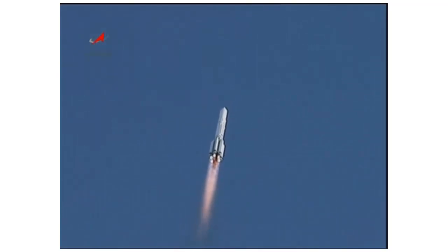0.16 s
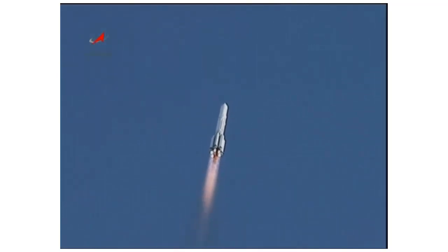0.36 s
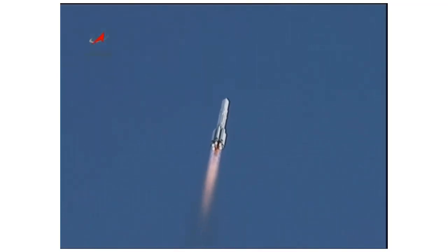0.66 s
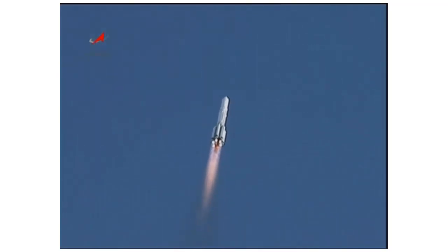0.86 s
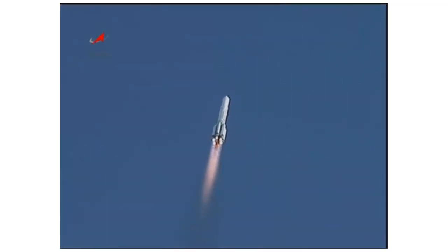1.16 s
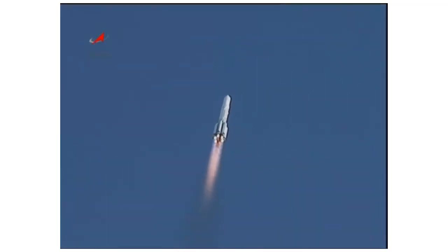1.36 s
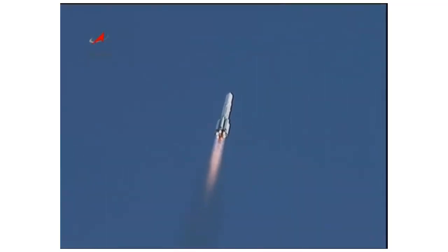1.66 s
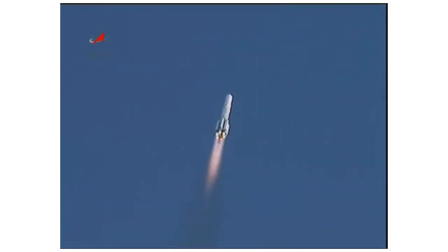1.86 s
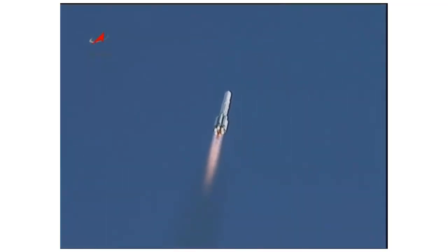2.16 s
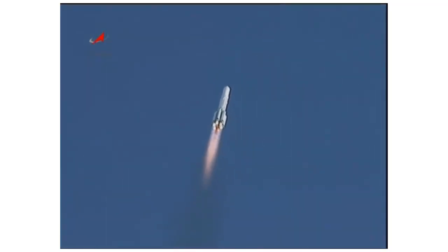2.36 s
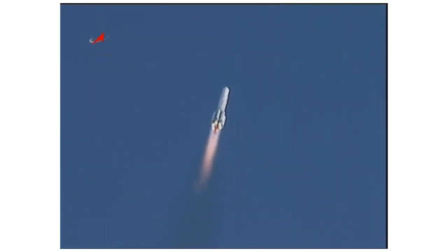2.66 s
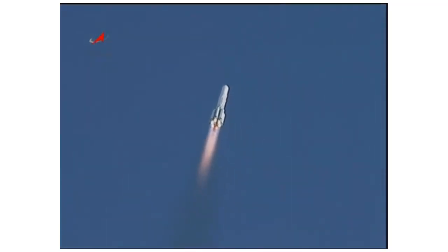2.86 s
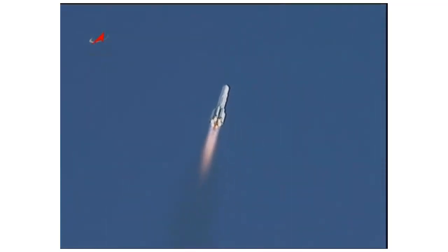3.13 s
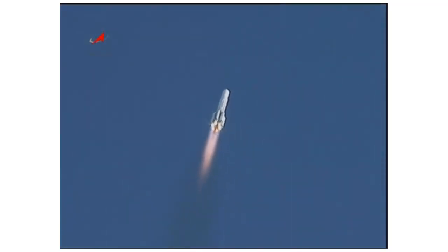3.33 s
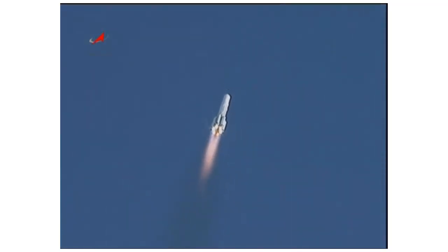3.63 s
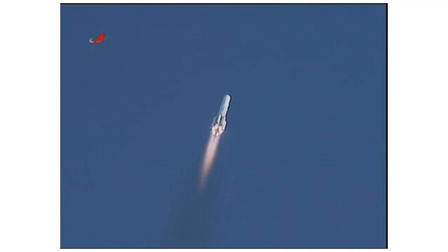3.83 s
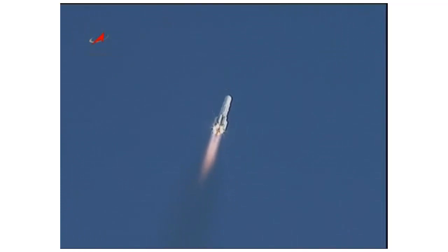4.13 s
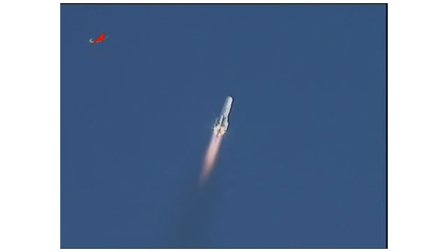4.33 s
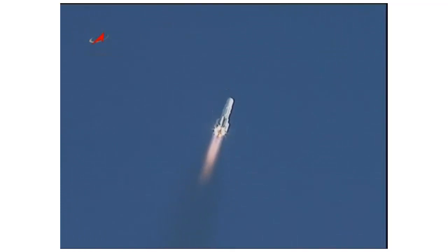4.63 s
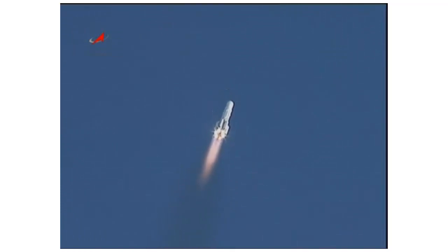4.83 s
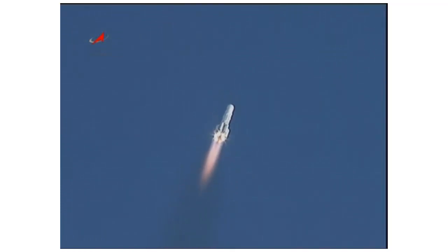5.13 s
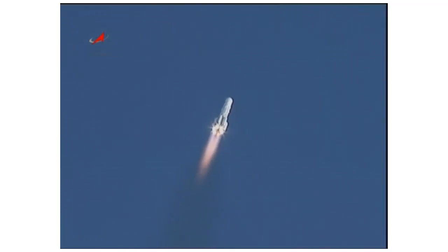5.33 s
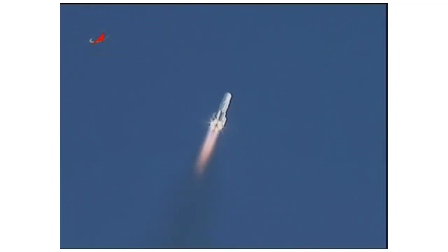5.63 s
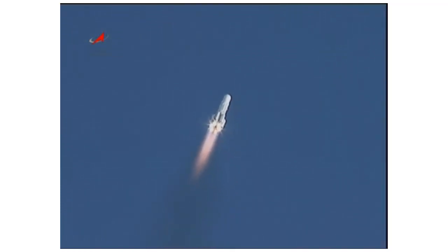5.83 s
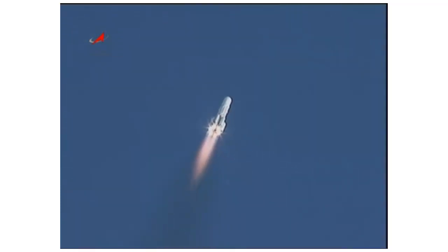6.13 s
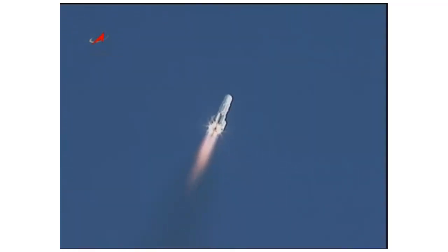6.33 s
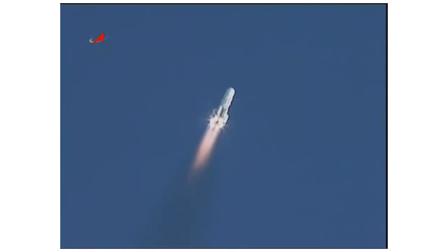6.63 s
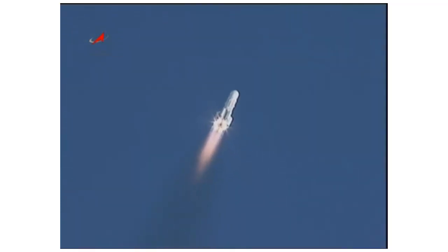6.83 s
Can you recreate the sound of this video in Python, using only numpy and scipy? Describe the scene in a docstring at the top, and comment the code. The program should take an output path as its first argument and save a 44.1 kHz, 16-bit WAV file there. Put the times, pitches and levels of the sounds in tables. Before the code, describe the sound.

A large rocket climbs away with a heavy, distorted roar and dense tearing crackle, slowly growing duller and fainter, with one tiny dropout near the end.

```python
"""Rocket climbing away, overloaded microphone

Open ground: a large rocket gives a turbulent roar, slow surges and a train of steep shock fronts.
Roar is gusting filtered noise, shocks are tanh jumps, cracks are short steep pulses; the ground doubles them.
Soft saturation and a bass cut square the waves into a tearing crackle trailed by fizz.
The sound dulls and fades with distance; once it cuts out briefly, with a click at each end."""
import sys
import numpy as np
from scipy import signal
from scipy.fft import rfft, irfft, next_fast_len
from scipy.io import wavfile
from scipy.ndimage import uniform_filter1d

SR = 44100
rng = np.random.default_rng(int(sys.argv[2]) if len(sys.argv) > 2 else 0)


def dump_mix(stems):
    """Bounce the given channels to the path in sys.argv[1] as a 16-bit WAV at rate SR."""
    frames = np.atleast_2d(stems).T  # one column per channel
    limited = np.clip(frames, -1, 1)  # hard clip at full scale
    pcm = np.round(limited * 32767).astype(np.int16)
    wavfile.write(sys.argv[1], SR, pcm)


N = 308258

# Turbulent roar spectrum, of which only the shape counts. Each row: frequency in Hz, density in dB per Hz.
ROAR_SPECTRUM = [(12, 1.5), (35, -16.5), (80, 8), (150, -2), (260, -8.5), (450, -15), (900, -19.5),
                 (2000, -27.5), (10000, -58)]
# Sharpness of the wave fronts, used relative to its mean. Each row: time in seconds, treble level in dB.
PLUME_SHARPNESS = [(0.0, -58.5), (0.33, -48), (0.99, -52.5), (1.261, -50.5), (1.54, -55), (2.61, -53.5),
                   (2.7, -54.5), (5.59, -58.5), (5.649, -64.5), (6.29, -55.5), (6.6, -62), (6.99, -60)]
# Lag of the ground reflection, growing as the rocket rises. Each row: time in seconds, lag in seconds.
GROUND_LAG = [(0, 0.0056), (3.5, .0058), (7, 0.00608)]
# Largest surges, which hush the crackle. Each row: middle in seconds, length in seconds.
LARGE_SURGES = [(0.2528, 0.018), (0.292, 0.0099), (0.388, 0.0069), (0.488, 0.0087), (0.855, 0.01),
                (0.915, 0.0082), (0.983, 0.0059), (1.009, 0.0078), (1.096, 0.011), (1.166, 0.0082),
                (1.304, .006), (1.329, 0.0067), (1.59, 0.0098), (1.896, 0.0087), (1.967, 0.0065),
                (2.136, 0.0082), (2.306, 0.01), (2.553, 0.015), (2.697, 0.0078), (2.808, 0.011),
                (2.896, 0.0096), (3.038, .006), (3.061, 0.007), (3.169, 0.0069), (3.280, 0.0077),
                (3.359, 0.0092), (3.46, 0.0084), (3.625, .011), (4.129, 0.0084), (4.278, 0.00876),
                (4.424, 0.008), (4.497, 0.0073), (4.541, 0.0093), (4.585, 0.0058), (4.763, 0.0063),
                (5.339, 0.0086), (5.554, 0.0093), (5.583, 0.013), (5.733, 0.0088), (6.035, 0.006),
                (6.249, .008), (6.275, 0.0087), (6.781, 0.0098)]
# Loudest cracks; snap and echo levels set edge steepness, relative to the mean snap. Each row: time in
# seconds, snap level in dB, ground echo snap level in dB, rasp of the volley around it in dB.
LOUD_CRACKS = [(0.0146, -49, -51, 9), (0.049, -46.0, -49.0, 3.0), (0.0716, -52.5, -60, 14),
               (0.1034, -53, -60, -2), (0.1426, -51.5, -43, 2), (0.1756, -39.5, -46, 10),
               (0.2351, -52.5, -65, -10), (0.272, -37, -38, 9), (0.3554, -37, -41, 8),
               (0.3946, -43.5, -48.0, 10), (0.4242, -51, -71, 0.5), (0.4777, -32, -46, 2.0),
               (0.5001, -44.5, -56.0, 8.5), (0.5259, -57, -49, 8), (0.5621, -51, -56.0, 2),
               (0.5887, -49, -63, -4), (0.6659, -45, -54, 2.0), (0.7156, -51, -39, -17),
               (0.7532, -49, -60, -3), (0.8124, -51, -54, 13), (0.83, -49.5, -54.0, 8),
               (0.85, -53, -67, -18), (0.8855, -54, -46, 6), (0.9331, -43.5, -40, 9),
               (1.0637, -53, -56, -4), (1.0852, -40, -37, 10), (1.1059, -53, -46.0, 2),
               (1.1801, -50, -51.0, -2), (1.199, -56, -64, 0), (1.234, -53.5, -51, 5),
               (1.266, -59, -54.0, -4), (1.3142, -55.5, -76, 17), (1.338, -46, -51, 1),
               (1.3653, -46.5, -48, -13), (1.375, -50, -55, -7), (1.3947, -42, -50, -6),
               (1.4831, -54, -54, 6), (1.5136, -45.5, -53, -5), (1.532, -51, -71, -2),
               (1.5795, -51.0, -62, 5), (1.6235, -49, -67, -2), (1.6925, -51.5, -65, -17),
               (1.7542, -39.5, -41, 7), (1.7736, -56, -57, -1.0), (1.7972, -58, -52.0, 11),
               (1.815, -54, -59, 1), (1.8361, -40, -44, -4), (1.8853, -51.5, -60, 2.0),
               (1.9294, -57, -63, 5), (1.9474, -53.5, -57, 1), (1.9941, -37.5, -48, 0),
               (2.1495, -44, -54, 6), (2.228, -54, -55, 7), (2.282, -48.5, -54, 13),
               (2.3162, -51, -44, 2.0), (2.3501, -51.5, -73, -1), (2.4067, -49.5, -58, -4),
               (2.4257, -51, -59.0, 10), (2.4477, -52.5, -58, 4), (2.4693, -50, -48, -3),
               (2.5031, -37.5, -52, 3), (2.5314, -43.5, -35, 17), (2.5968, -47, -51, 3),
               (2.6782, -33, -51, 25), (2.708, -52, -52.0, 3), (2.7337, -44.5, -47, 3),
               (2.7707, -48, -47, 1.0), (2.796, -51, -57.0, 3), (2.8421, -54.5, -47, -8),
               (2.9267, -55.5, -53, 0), (2.9575, -47, -54, -2), (2.9845, -51.5, -62, 11),
               (3.0532, -51, -63, -5), (3.0767, -63.5, -57, -4), (3.1559, -51.5, -56, 8),
               (3.1875, -52.0, -64, 7), (3.2273, -56, -53, 2.0), (3.2597, -52, -59.0, 3.0),
               (3.2892, -49, -57, 13), (3.3389, -53.5, -62, 5), (3.3682, -55, -60, -1),
               (3.4391, -56, -44, 12), (3.4639, -44, -41, 7), (3.4767, -60.5, -50, 7),
               (3.4866, -52, -58, 0), (3.4993, -52, -65, 12), (3.5108, -53.5, -64, -10),
               (3.5554, -50, -51, 13), (3.6037, -45.5, -50, 1), (3.7083, -47.5, -60, 4),
               (3.7367, -51, -49, 4), (3.8227, -50, -46, 14.5), (3.9449, -58.5, -56, -7),
               (4.0166, -60, -56, 6), (4.054, -50, -61.0, 10), (4.1396, -49.5, -71, 3),
               (4.2027, -52.5, -55, -2), (4.2318, -56.5, -62, 4.0), (4.3314, -56.5, -58, -14),
               (4.3673, -50.5, -55, -2), (4.4784, -56.5, -69, 5), (4.5067, -51.5, -57, 5),
               (4.5262, -56.5, -69, 12), (4.5499, -51.5, -48, -3), (4.6181, -58, -61, 0),
               (4.6698, -64, -62, 9), (4.7014, -55.5, -60, 8), (4.7772, -34.5, -53.5, 9.0),
               (4.8159, -53, -63.0, 1), (4.9219, -61, -73, -1), (4.9737, -60.5, -68, -8),
               (5.0387, -54.5, -62, 6), (5.085, -42, -49.0, 10), (5.135, -58.5, -70, 5),
               (5.1661, -62, -77, 11), (5.178, -66, -68, 3), (5.2124, -50.5, -53, 0),
               (5.2427, -56.5, -67, 2), (5.2605, -57.0, -68, 1.0), (5.3492, -60, -70, -6),
               (5.3678, -54.5, -36, 13), (5.4211, -53, -56, 4), (5.5008, -56, -66, 6),
               (5.5401, -54.5, -72, -2), (5.5722, -57, -63, 4), (5.593, -50, -50.5, 2.0),
               (5.669, -53.5, -57, 8), (5.7034, -53, -49, 1), (5.7197, -46.5, -55, 6.0),
               (5.7653, -53, -50, 6), (5.8039, -48, -50, -6), (5.8494, -53.5, -60, 7),
               (5.9027, -59.5, -59, 1), (5.9131, -47.5, -63, -3), (6.0477, -55, -57, 12),
               (6.0849, -52, -70, -5), (6.112, -56, -55, 5), (6.2056, -54, -60.0, -1),
               (6.228, -47, -46.5, -5), (6.2881, -47, -42.5, -2), (6.3561, -56.5, -56.0, 5.0),
               (6.3763, -54.5, -70.0, -7), (6.4078, -60, -60, 1), (6.4272, -56.5, -61, 8),
               (6.4403, -58.5, -69, -4), (6.5272, -65.5, -62, 7), (6.5945, -63.5, -68, 5),
               (6.6667, -60, -64, -9), (6.7451, -54.5, -64, 2.0), (6.7916, -58.5, -69, -5),
               (6.8964, -60.0, -69, 12)]
# Microphone response. Each row: frequency in Hz, gain in dB.
MICROPHONE_RESPONSE = [(30, 1), (60, 3.5), (90, -0.5), (125, 3), (175, 0.5), (250, 0.5), (320, -2),
                       (410, 0.5), (560, -0.5), (900, -0.5), (1500, -2), (11000, -5.5)]
# Spectrum shape of the fizz on the crackle. Each row: frequency in Hz, density in dB per Hz.
FIZZ_SPECTRUM = [(500, -58.5), (1500, 8), (3000, 5.5), (4500, 0), (6000, -3.5), (10000, -11.5),
                 (13000, -26)]
# The one dropout: start in seconds, end in seconds.
DROPOUT = (5.3725, 5.4205)

BAND_LIMIT_HZ = 12000
TIME_S = np.arange(N) / SR
VOLLEY_LAG_S, VOLLEY_S = 0.00068, 0.0085
LULL_DB, REBOUND_DB, REBOUND_LAG_S, REBOUND_S = -3, 2.5, 0.0055, 0.0033


def amp(db):
    """Decibels to gain."""
    return 10 ** (np.asarray(db) / 20)


def evened(x):
    """Scales to rms 1, over all channels together."""
    return x / np.sqrt(np.mean(x ** 2) + 1e-20)


def coloured(x, points):
    """Filters by a spectrum of (Hz, dB) points, interpolated over log frequency."""
    points_hz, points_db = np.transpose(points)
    size = next_fast_len(N + 8192)  # padding against wrap-around
    bins_hz = np.fft.rfftfreq(size, 1 / SR)
    gain = amp(np.interp(np.log(bins_hz + 1), np.log(points_hz), points_db))
    return irfft(rfft(x, size) * gain, size)[..., :N]


def band(x, hz, kind, order=1):
    """Causal Butterworth low-pass or high-pass."""
    sos = signal.butter(order, min(hz, SR / 2 - 1), kind, fs=SR, output="sos")
    return signal.sosfilt(sos, x)


def around(at_s, reach_s):
    """Slice of samples within reach of a moment, and their times counted from it."""
    first = max(int((at_s - reach_s) * SR), 0)
    last = max(int((at_s + reach_s) * SR), 0)
    part = slice(first, last)
    return part, TIME_S[part] - at_s


def normal_within(count, low, high):
    """Normal draws, clipped."""
    return np.clip(rng.standard_normal(count), low, high)


def wander(per_s):
    """Random curve: straight lines between normal draws, per_s draws a second."""
    return np.interp(TIME_S * per_s, np.arange(1000), rng.standard_normal(1000))


def moments(per_s, scatter):
    """Irregular times: an even pace, each early or late by a random share of the gap."""
    chance = rng.standard_normal(3000)
    return (np.arange(len(chance)) + scatter * chance) / per_s


def between_cracks(times_s, values, clear_s):
    """Rows (s, value) for those times that keep clear of the loud cracks."""
    loud_s = np.transpose(LOUD_CRACKS)[0]
    return [(s, value) for s, value in zip(times_s, values)
            if s < TIME_S[-1] and abs(loud_s - s).min() > clear_s]


def ground_lag(at_s):
    """Lag in seconds of the ground reflection."""
    return np.interp(at_s, *np.transpose(GROUND_LAG))


def ground(x, echo_db=-3, dull_hz=7000, wander_s=0.0005, wander_per_s=22):
    """Ground returns each wave duller and later; the lag wanders as the source moves along the plume."""
    lag_s = ground_lag(TIME_S) + wander_s * wander(wander_per_s)
    echo = np.interp(TIME_S - lag_s, TIME_S, band(x, dull_hz, "low"))
    return x + amp(echo_db) * echo


def stereo_noise(level_db=-31):
    """Faint noise, independent left and right, coloured like the roar."""
    return amp(level_db) * evened(coloured(rng.standard_normal((2, N)), ROAR_SPECTRUM))


def plume(flicker_db=2.1, flickers_per_s=30):
    """Sharpness of the fronts in dB about its mean: it flickers and falls with distance."""
    times_s, db = np.transpose(PLUME_SHARPNESS)
    return np.interp(TIME_S, times_s, db - db.mean()) + flicker_db * wander(flickers_per_s)


def volleys():
    """Rasp in dB: set around each loud crack, sinking in each large surge, rebounding just after it."""
    rasp_db = np.zeros(N)
    for s, _, _, volley_db in LOUD_CRACKS:
        part, t = around(s + VOLLEY_LAG_S, 10 * VOLLEY_S)
        rasp_db[part] += volley_db * np.exp(-(t / VOLLEY_S) ** 2)
    for s, length_s in LARGE_SURGES:
        part, t = around(s + length_s / 2 + REBOUND_LAG_S, 10 * length_s)
        lull = (t < 0) & (t > -length_s - REBOUND_LAG_S)
        rebound_db = (t >= 0) * REBOUND_DB * np.exp(-abs(t) / REBOUND_S)
        rasp_db[part] = np.where(lull, LULL_DB, rasp_db[part] + rebound_db)
    return uniform_filter1d(rasp_db, size=45)  # 1 ms


def roar(sharp_db, rasp_db, level_db=-6, split_hz=500, brighten=0.69, gust_db=2.5, gusts_per_s=40):
    """Turbulent mixing noise; its upper part gusts and follows the volleys and the plume's sharpness."""
    noise = evened(coloured(rng.standard_normal(N), ROAR_SPECTRUM))
    low = band(noise, split_hz, "low")
    upper_db = brighten * sharp_db + rasp_db + gust_db * wander(gusts_per_s)
    return amp(level_db) * (low + (noise - low) * amp(upper_db))


def lesser_surges(per_s=8, scatter=0.4, length_s=0.0055, spread_db=1.5, clear_s=0.014):
    """Rows (middle s, length s) of the extra surges, at random between the loud cracks."""
    times_s = moments(per_s, scatter)
    lengths_s = length_s * amp(spread_db * normal_within(len(times_s), -2, 1))
    return between_cracks(times_s, lengths_s, clear_s)


def surges(size_db=12, trough=0.69, trough_s=0.00077):
    """Large eddies: a long flat push, then a short trough."""
    out = np.zeros(N)
    for s, length_s in list(LARGE_SURGES) + lesser_surges():
        part, t = around(s, 2 * length_s + 10 * trough_s)
        push = np.exp(-(2 * t / length_s) ** 6)  # flat top
        suction = np.exp(-((t - length_s / 2 - trough_s) / trough_s) ** 2)
        out[part] += push - trough * suction
    return amp(size_db) * out


def front(t, rise_s, relax_s):
    """Shock: pressure sags, jumps up within the rise time, and relaxes."""
    return np.tanh(t / rise_s) * np.exp(-abs(t) / relax_s)


def shocks(sharp_db, rasp_db, per_s=150, level_db=1, spread_db=4, rise_s=0.0004, relax_s=0.0039,
           relax_spread_db=3.5, steepen=0.78, volley_steepen=1.6, scatter=0.495):
    """Irregular fronts; stronger ones are steeper, and the air rounds them as the rocket recedes."""
    times_s = moments(per_s, scatter)
    sizes = amp(spread_db * normal_within(len(times_s), -2, 1))
    steep_db = np.interp(times_s, TIME_S, steepen * sharp_db + volley_steepen * rasp_db)
    rises_s = rise_s / sizes / amp(steep_db)
    relaxes_s = relax_s * amp(relax_spread_db * normal_within(len(times_s), -2, 2))
    out = np.zeros(N)
    for s, size, rise, relax in zip(times_s, sizes, rises_s, relaxes_s):
        part, t = around(s, 10 * relax)
        out[part] += size * front(t, rise, relax)
    return amp(level_db) * out


def swallowed(hard_fronts, middle_s=0.0011, reach_s=0.00069, depth=1.0, echo_depth=0.72):
    """Gain of the small waves: each crack and its ground echo overtake and swallow their neighbours."""
    gain = np.ones(N)
    for s, _ in hard_fronts:
        for at_s, share in (s, depth), (s + ground_lag(s), echo_depth):
            part, t = around(at_s + middle_s, 10 * reach_s)
            gain[part] *= 1 - share * np.exp(-(t / reach_s) ** 2)
    return gain


def cracks(hard_fronts, size_db=4, length_s=0.001875, length_spread_db=2.5, extent=1.67, back_rise=1.64,
           ragged_db=-17, ragged_hz=1800, ragged_s=0.00059):
    """Short pulses that snap up, then down; turbulent air scatters a ragged wake around each."""
    out, wake = np.zeros(N), np.zeros(N)
    scatter = evened(band(rng.standard_normal(N), ragged_hz, "low", order=2))
    lengths_s = length_s * amp(length_spread_db * normal_within(len(hard_fronts), -2, 1))
    for (s, rise_s), length in zip(hard_fronts, lengths_s):
        part, t = around(s, 10 * length)
        edges = np.tanh(t / rise_s) * np.tanh((length - t) / (back_rise * rise_s))
        out[part] += edges * np.exp(-((t / length - 0.5) / extent) ** 2)
        wake[part] += 1 / np.cosh(t / ragged_s)
    return amp(size_db) * (out + amp(ragged_db) * wake * scatter)


def lesser_cracks(sharp_db, per_s=22, scatter=0.4, rise_s=0.0002, spread_db=2.5, steepen=0.32, clear_s=0.013):
    """Rows (s, rise s) of lesser cracks, at random between the loud ones, softening with distance."""
    times_s = moments(per_s, scatter)
    steep_db = steepen * np.interp(times_s, TIME_S, sharp_db)
    steep_db = steep_db + spread_db * normal_within(len(times_s), -1, 2)
    return between_cracks(times_s, rise_s / amp(steep_db), clear_s)


def forerunners(hard_fronts, lead_s=0.003824, spread_db=2.5, blunter=3.0, share=0.6):
    """Rows (s, rise s) of the blunter fronts that run just ahead of many loud cracks."""
    leads_s = lead_s * amp(spread_db * normal_within(len(hard_fronts), -1, 2))
    lots = rng.random(len(hard_fronts))
    return [(s - lead, blunter * rise) for (s, rise), lead, lot in zip(hard_fronts, leads_s, lots)
            if lot < share]


def with_rebounds(fronts, rise_s=0.00026, clear_s=0.005):
    """Rows (s, rise s): fronts outside the large surges, plus a dull one ending the suction behind these."""
    middles_s, lengths_s = np.transpose(LARGE_SURGES)
    reach_s = lengths_s / 2 + REBOUND_LAG_S
    kept = [(s, rise) for s, rise in fronts if np.all(abs(s - middles_s) > reach_s)]
    return kept + between_cracks(middles_s + reach_s, [rise_s] * len(reach_s), clear_s)


def lesser_crackle(hard_fronts):
    """Lesser cracks with their strong, duller ground echoes."""
    return ground(cracks(hard_fronts), echo_db=1.0, dull_hz=2500, wander_s=0.00053)


def loud_cracks(rise_s=0.000085, echo_rise_s=0.00011, steepen=1.05):
    """Rows (s, rise s) of loud cracks and of their echoes: the steeper the edge, the brighter the snap."""
    times_s, snap_db, echo_db, _ = np.transpose(LOUD_CRACKS)
    rises_s = rise_s / amp(steepen * (snap_db - snap_db.mean()))
    echo_rises_s = echo_rise_s / amp(steepen * (echo_db - snap_db.mean()))
    return list(zip(times_s, rises_s)), list(zip(times_s + ground_lag(times_s), echo_rises_s))


def loud_crackle(direct, echoes):
    """Loud cracks, short pulses flanked by deep suction; the pulses of their ground echoes are longer."""
    near = cracks(direct, size_db=5.0, length_s=0.001503, extent=2.53, back_rise=1.56)
    reflected = cracks(echoes, size_db=3.0, length_s=0.00187, extent=1.95, back_rise=0.93)
    return near + reflected


def scene(swell=0.031, fade_db_per_s=0.853, hush=0.047):
    """Waves from ahead, the larger swallowing the smaller, plus faint stereo noise; all fade with distance."""
    sharp_db, rasp_db, surge = plume(), volleys(), surges()
    loud, echoes = loud_cracks()
    lesser = with_rebounds(lesser_cracks(sharp_db) + forerunners(loud))
    small = ground(roar(sharp_db, rasp_db) + shocks(sharp_db, rasp_db)) * swallowed(lesser)
    small = small + lesser_crackle(lesser)
    waves = small / (1 + abs(hush * surge)) + surge
    kept = swallowed(loud, middle_s=0.00077, reach_s=0.0014, depth=0.92, echo_depth=0.61)
    pressure = waves * kept + loud_crackle(loud, echoes)
    return (pressure + stereo_noise()) * amp(swell * sharp_db - fade_db_per_s * TIME_S)


def fizz(x, level_db=-6, above_hz=3000, fade_hz=55, width=0.017):
    """Fine noise trailing each sharp edge: it follows the smoothed treble power of the left channel."""
    edges = band(x[0], above_hz, "high", order=2) ** 2
    power = band(edges, fade_hz, "low") + 0.06 * band(edges, 9.0, "low")  # quick fade, faint longer one
    middle, side = coloured(rng.standard_normal((2, N)), FIZZ_SPECTRUM)
    noise = evened(np.array([middle + width * side, middle - width * side]))
    return amp(level_db) * np.sqrt(abs(power)) * noise


def cut_out(x, going_db=-33, returning_db=-43, rise_s=0.00002, relax_s=0.0013, fade_s=0.00021):
    """The sound drops out for a moment, with a click as it goes and a softer one as it returns."""
    start_s, end_s = DROPOUT
    going = amp(going_db) * front(TIME_S - start_s, rise_s, relax_s)
    returning = amp(returning_db) * front(TIME_S - end_s, rise_s, relax_s)
    gate = np.clip(np.maximum(start_s - TIME_S, TIME_S - end_s) / fade_s, 0, 1)
    return x * gate + going + returning


def record(dry, drive_db=5, ceiling_db=-33, leak_db=-22, leak_hz=200, coupling_hz=23, hiss_db=-95):
    """Microphone saturates softly; its bass cut makes flat tops droop; fizz, hiss, dropout, band limit."""
    driven = amp(drive_db) * dry
    ripple = amp(leak_db) * band(driven, leak_hz, "high")  # fast waves still ripple the flat tops
    squared = amp(ceiling_db) * (driven / np.sqrt(1 + driven ** 2) + ripple)
    out = coloured(band(squared, coupling_hz, "high", order=2), MICROPHONE_RESPONSE)
    out = out + fizz(out) + amp(hiss_db) * rng.standard_normal((2, N))
    low_pass = signal.firwin(255, BAND_LIMIT_HZ, window=("kaiser", 8), fs=SR)
    return signal.oaconvolve(cut_out(out), low_pass[None], "same")


dry = scene()
out = record(dry)
dump_mix(out)
```